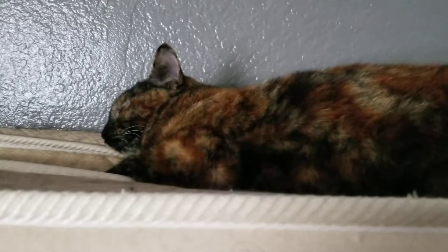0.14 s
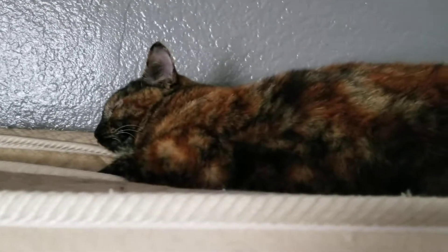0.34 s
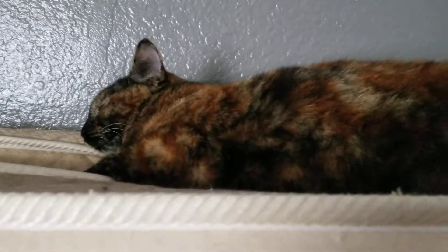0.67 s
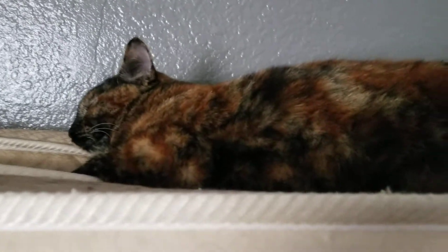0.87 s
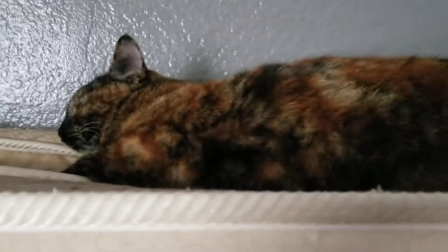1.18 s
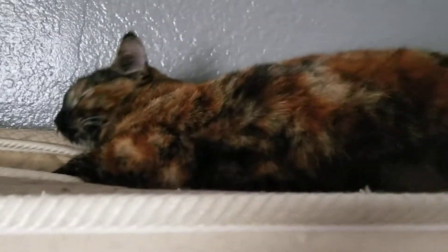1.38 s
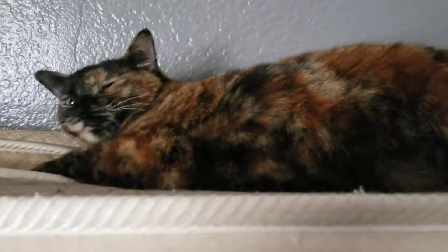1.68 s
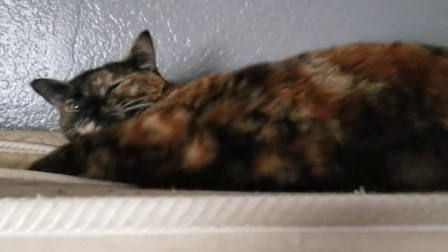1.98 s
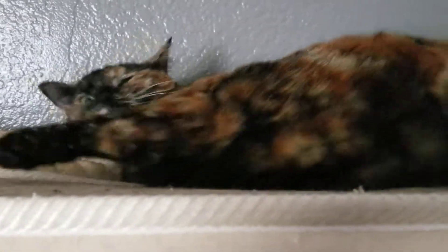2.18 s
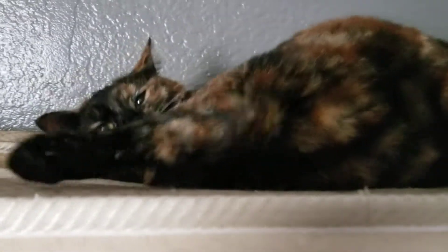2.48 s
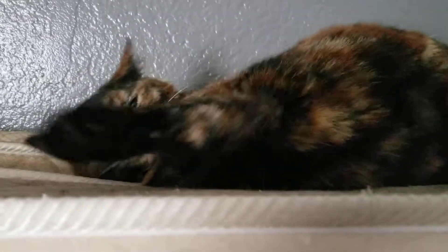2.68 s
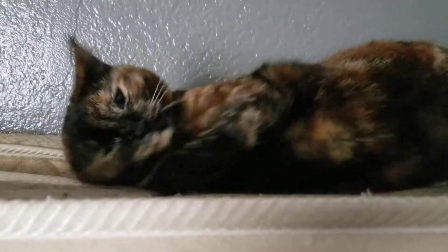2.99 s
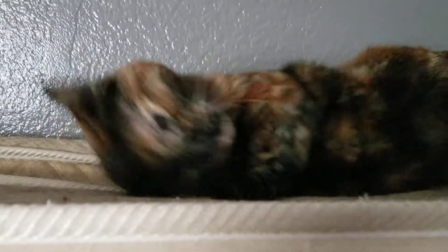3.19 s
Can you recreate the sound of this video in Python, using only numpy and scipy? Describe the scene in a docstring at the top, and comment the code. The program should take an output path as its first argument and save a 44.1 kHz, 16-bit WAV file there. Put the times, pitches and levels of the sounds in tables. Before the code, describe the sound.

A cat trills once, close by, from about 1.3 to 1.8 seconds, starting hoarse and fluttering, then clearing into a rising note that flicks up at the end. Two tiny clicks come first, at 0.6 and 1.1 seconds. From 2.3 to 3.4 seconds the cat rolls on a cushion in a few faint, dull rustles. A low throbbing motor hum, rumble and soft hiss fill the small room throughout.

```python
"""A small room, where a cat lying by a wall gives one short rising trill, then rolls over on its cushion.
The call is a stack of harmonics coloured by the nose and a nearly closed mouth: it starts hoarse,
flutters, and clears into a steady note that flicks up as it stops. Body and fur rub softly on cloth.
Two small ticks come before the call; under it all lie a throbbing motor hum, rumble, air and hiss."""
import sys
import numpy as np
from scipy import signal
from scipy.fft import rfft, irfft, next_fast_len
from scipy.io import wavfile
from scipy.ndimage import map_coordinates

SR = 44100
rng = np.random.default_rng(int(sys.argv[2]) if len(sys.argv) > 2 else 0)


def file_out(sig):
    """Save sig as 16-bit WAV at sys.argv[1]."""
    # one column per channel
    cols = np.atleast_2d(sig).T
    # limit, then scale
    lim = np.clip(cols, -1, 1)
    pcm = np.round(lim * 32767).astype(np.int16)
    wavfile.write(sys.argv[1], SR, pcm)


N = 147294


def trill():
    """The cat's voice: rising harmonics, shaken by a flutter that dies away with the hoarseness."""
    # melody of the call: time_s, pitch_hz
    melody = [(1.30, 536.5), (1.37, 546.5), (1.41, 547.4), (1.435, 609.6), (1.49, 625.2), (1.535, 621.3),
              (1.59, 661), (1.63, 686), (1.70, 712), (1.768, 703), (1.787, 783)]
    # harmonic balance: time_s, fundamental_db, second_db, third_db, upper_db
    balance = [(1.285, -85, -66, -72, -95), (1.315, -62, -53.5, -68, -90), (1.375, -56, -51, -60, -82),
               (1.41, -50.5, -47.5, -56, -78), (1.445, -47.5, -45, -59.5, -75),
               (1.475, -45.5, -43.5, -62.5, -65), (1.54, -45, -42, -63.5, -64),
               (1.558, -45.5, -47.5, -62, -64.5), (1.595, -50.5, -48, -68, -70),
               (1.64, -46, -45.5, -75, -72), (1.71, -44.5, -49, -77, -83), (1.772, -47.5, -49, -72, -84),
               (1.787, -58, -60, -69, -90), (1.80, -90, -90, -95, -105)]
    # grit in the voice: time_s, flutter_depth (share of pitch), roughness (0-1)
    texture = [(1.31, .04, .85), (1.39, .05, .55), (1.45, .048, .27), (1.51, .035, .15), (1.56, .012, .18),
               (1.65, .006, .1), (1.77, .008, .14)]
    # mouth and nose colour of the upper harmonics: frequency_hz, gain_db
    mouth = [(2300, -8), (3100, -17), (3500, -11), (3780, 0), (4000, -2), (4200, -10), (4450, -25),
             (5200, -34), (7500, -36), (8450, -21), (8800, -23), (9550, -11), (10300, -30), (15000, -34)]
    # colour of the hoarse noise: frequency_hz, gain_db
    rasp_colour = [(400, -16.5), (800, -9), (1150, 17), (1600, -5), (2200, 4.5), (3800, -6), (5000, -28),
                   (15000, -35.5)]
    flutter_hz, flutter_crest_s = 44.5, 1.451
    jitter, shimmer_db, rasp_db = .007, 1.1, -18
    t = clock()
    pitch, = curves(melody)
    first_db, second_db, third_db, upper_db = curves(balance)
    depth, rough = curves(texture)
    flutter = depth * np.cos(2 * np.pi * flutter_hz * (t - flutter_crest_s))
    hz = pitch * (1 + flutter + jitter * wobble(130) + .07 * rough * wobble(330))
    phase = 2 * np.pi * np.cumsum(hz) / SR

    def partial(k, pan_db, left_lead_rad):
        unsteady = 1 + (.1 + .55 * rough) * wobble(240)
        spread = np.array([[.5], [-.5]]) * left_lead_rad
        return np.sqrt(2) * pan(pan_db) * np.sin(k * phase + spread) * unsteady

    voice = amp(first_db) * partial(.98, pan_db=1.5, left_lead_rad=.42)
    voice += amp(second_db) * partial(2, pan_db=-1.6, left_lead_rad=1.5)
    voice += amp(third_db) * partial(3, pan_db=2.5, left_lead_rad=.6)
    upper = sum(amp(along(mouth, k * hz)) * partial(k, pan_db=7, left_lead_rad=-1) for k in range(4, 23))
    voice += amp(upper_db + 2.5 * wobble(110)) * upper
    puffs = 1 + np.cos(phase)  # the rasp pulses once per pitch cycle
    rasp = amp(second_db + rasp_db) * puffs * (.24 + 4 * rough) * noise(rasp_colour)
    tremolo = amp(26 * flutter + shimmer_db * wobble(110))  # louder on each upward swing
    sounding = (t > balance[0][0]) & (t < balance[-1][0])
    return sounding * (voice + rasp) * tremolo


def sizzle():
    """A thin, high edge of noise riding on the call."""
    # colour of the edge: frequency_hz, gain_db
    colour = [(3000, -24), (6000, -12), (7600, -20), (8700, -10), (9200, 2), (9750, 4), (10300, -15),
              (12500, -11), (15500, -6)]
    start_s, end_s, fade_s, level_db = 1.36, 1.83, .05, -74.5
    t = clock()
    gate = np.clip(np.minimum(t - start_s, end_s - t) / fade_s, 0, 1)
    return amp(level_db + 1.5 * wobble(70)) * gate * pan(db=5) * noise(colour)


def cushion_shifts():
    """The cat's body drags on the cushion in a few dull rustles."""
    # body movements: centre_s, half_length_s, level_db
    shifts = [(2.39, .1, -57), (2.72, 0.083, -62), (3.0, 0.17, -64.5), (3.32, 0.098, -59)]
    # colour of the cushion: frequency_hz, gain_db
    colour = [(400, 9), (1200, 7.5), (2400, 5), (3600, 1.5), (4800, -12.5), (5800, -19.5), (7500, -34),
              (12000, -16.5), (15500, -24)]
    return friction(shifts, colour, pan_db=4)


def fur_brushes():
    """Fur grazes the cloth in brief, bright whispers."""
    # strokes of fur: centre_s, half_length_s, level_db
    brushes = [(.655, 0.028, -73.5), (2.8, .025, -64)]
    # colour of fur on cloth: frequency_hz, gain_db
    colour = [(4000, -17), (7500, -20), (9300, -3), (10400, 2.5), (11200, 3), (12200, -11), (14000, -15),
              (15200, 3.5)]
    return friction(brushes, colour, pan_db=1)


def friction(strokes, colour, pan_db):
    """Rubbing on cloth: one bell-shaped swell of grainy noise per stroke."""
    swell = sum(amp(db) * np.exp(-((clock() - s) / half) ** 2 / 2) for s, half, db in strokes)
    grain = amp(2 * wobble(400))
    return swell * unit(grain * noise(colour)) * pan(pan_db)


def ticks():
    """Tiny, close clicks, each one snap and a very short scrape."""
    # clicks: start_s, level_db, tilt_db_per_octave
    hits = [(.6201, -22.5, 0), (1.0826, -22, -4.5)]
    # colour of a click: frequency_hz, gain_db
    colour = [(300, -15.5), (900, 4), (3200, -0.5), (4500, -11), (5600, -23), (7200, -17.5), (9000, -10.5),
              (12000, -8.5), (15500, -14)]
    scrape_db, scrape_t60_s, pivot_hz = -21, .006, 2000
    out = np.zeros((2, N))
    for start_s, level_db, tilt_db in hits:
        age = clock() - start_s
        click = amp(scrape_db - 60 * np.abs(age) / scrape_t60_s) * (age >= 0) * rng.standard_normal((2, N))
        click[:, round(start_s * SR)] += 1  # the snap
        tilted = [(hz, db + tilt_db * np.log2(hz / pivot_hz)) for hz, db in colour]
        out += amp(level_db) * signal.oaconvolve(click, ringing(tilted)[None], axes=1)[:, :N]
    return pan(db=5) * out


def motor_hum():
    """A motor drones; a weak tone just below beats against it, among other faint, unsteady tones."""
    # faint tones around the hum: pitch_hz, level_db
    tones = [(57.8, -55.5), (180, -57), (234.6, -53.5), (350.5, -57.5), (442, -66.5), (622, -75),
             (699, -71)]
    hum_hz, hum_db = 117.5, -32.9
    beat_hz, beat_crest_s, beat_db = 5.39, .17, -49.5
    t = clock()
    phase = 2 * np.pi * hum_hz * t + .6 * wobble(7.3)
    drone = amp(hum_db + .6 * wobble(7)) * np.sin(phase)
    beating = amp(beat_db) * np.sin(phase - 2 * np.pi * beat_hz * (t - beat_crest_s))
    faint = sum(amp(db + 2 * wobble(8)) * np.sin(2 * np.pi * hz * t + .86 * wobble(7))
                for hz, db in tones)
    return np.sqrt(2) * (drone + beating + faint)


def air():
    """Room tone: a low rumble, with moving air and hiss that ease off very slightly."""
    # colour of the air and hiss: frequency_hz, gain_db
    air_colour = [(180, -10.5), (300, -0.5), (400, -6), (500, -10), (720, -12), (900, -15), (1500, -21),
                  (2100, -22.5), (2900, -28.5), (3800, -32.5), (4300, -38.5), (4900, -44), (6000, -51.5),
                  (7400, -56.5), (9000, -54), (11800, -46), (15500, -46.5)]
    # colour of the rumble: frequency_hz, gain_db
    rumble_colour = [(20, -7), (30, -10), (38, 18.5), (50, 20.5), (70, 10.5), (95, 19.5), (140, 3),
                     (165, 18), (195, 18), (225, 19), (260, 11), (290, 4.5), (340, -33)]
    rumble_db, air_db, drift_db_per_s = -46, -49, -.3
    drift_db = drift_db_per_s * (clock() - clock().mean()) + .2 * wobble(2.8)
    rumble = amp(rumble_db) * noise(rumble_colour)
    return rumble + amp(air_db + drift_db) * pan(db=.6) * noise(air_colour)


def room(x, wet_db=-19):
    """The short, soft tail of a furnished room, ringing longest in the mids."""
    # reverb decay: frequency_hz, t60_s
    decay = [(200, 0.37), (1500, 0.84), (10000, 0.4)]
    hz, t, bands = signal.stft(rng.standard_normal((2, SR // 2)), SR, nperseg=256)
    fade = amp(-60 * t / along(decay, hz)[:, None])
    tail = signal.istft(bands * fade, SR, nperseg=256)[1]
    return amp(wet_db) * signal.fftconvolve(x, tail / np.linalg.norm(tail[0]), axes=1)[:, :N]


def noise(colour):
    """Coloured stereo noise of rms 1, narrow in the bass and wide in the treble."""
    # likeness of left and right: frequency_hz, correlation (0-1)
    likeness = [(30, 0.93), (120, 0.64), (250, 0.89), (500, 0.49), (1000, 0), (2000, 0), (4000, 0.057),
                (12000, 0)]

    def mid_side_gains(hz):
        width = np.arccos(np.clip(along(likeness, hz), -1, 1)) / 2
        return amp(along(colour, hz)) * [np.cos(width), np.sin(width)]

    mid, side = filtered(rng.standard_normal((2, N)), mid_side_gains)
    return unit(np.array([mid + side, mid - side]))


def ringing(colour, size=2048):
    """The minimum-phase impulse response of a colour."""
    gain = amp(along(colour, np.fft.rfftfreq(size, 1 / SR)))
    cepstrum = irfft(np.log(gain))
    cepstrum[1:size // 2] *= 2
    cepstrum[size // 2 + 1:] = 0
    return irfft(np.exp(rfft(cepstrum)))


def filtered(x, response):
    """Equalise x with a gain that depends on frequency."""
    size = next_fast_len(N + SR // 2)
    return irfft(rfft(x, size) * response(np.fft.rfftfreq(size, 1 / SR)), size)[..., :N]


def along(points, hz):
    """Read (frequency_hz, value) points on a log frequency axis."""
    freqs, values = np.transpose(points)
    return np.interp(np.log(hz + 1), np.log(freqs + 1), values)


def curves(rows):
    """One automation curve for each column after the time."""
    times, *columns = np.transpose(rows)
    return [np.interp(clock(), times, column) for column in columns]


def wobble(rate):
    """A smooth random curve, rate knots a second."""
    return map_coordinates(rng.standard_normal(int(N * rate / SR) + 4), [clock() * rate])


def pan(db):
    """Stereo gains, the left louder by db."""
    return amp(np.array([[db], [-db]]) / 2)


def amp(db):
    return 10 ** (np.asarray(db) / 20)


def unit(x):
    return x / np.sqrt(np.mean(x ** 2) + 1e-20)


def clock():
    return np.arange(N) / SR


def scene():
    """Call and ticks ring in the room; sizzle, rustles, hum and air stay dry."""
    near = trill() + ticks()
    movement = cushion_shifts() + fur_brushes()
    return near + room(near) + sizzle() + movement + motor_hum() + air()


def record(dry):
    """A brick-wall cut of the highest treble."""
    cutoff_hz = 15780
    return filtered(dry, lambda hz: hz < cutoff_hz)


dry = scene()
out = record(dry)
file_out(out)
```